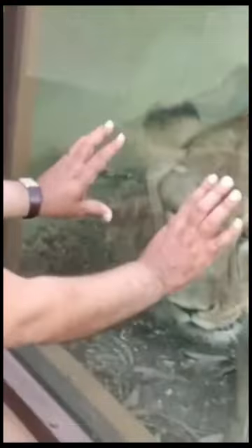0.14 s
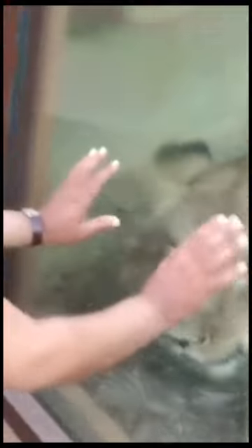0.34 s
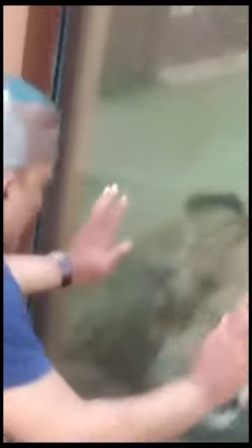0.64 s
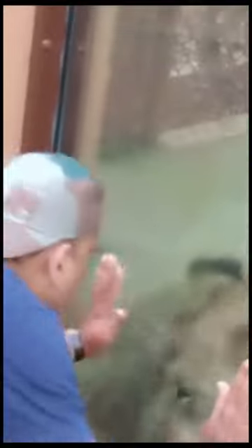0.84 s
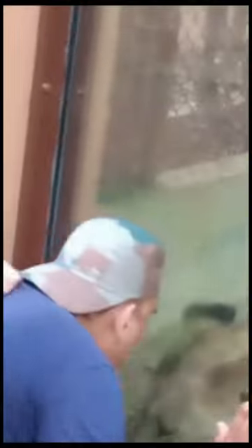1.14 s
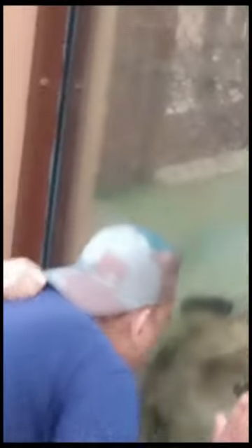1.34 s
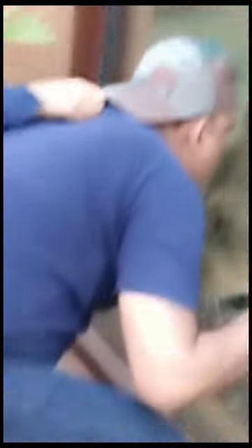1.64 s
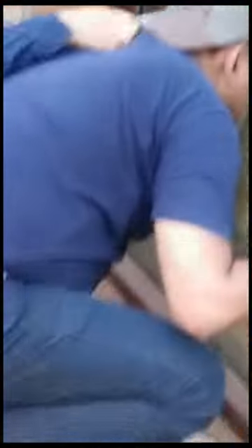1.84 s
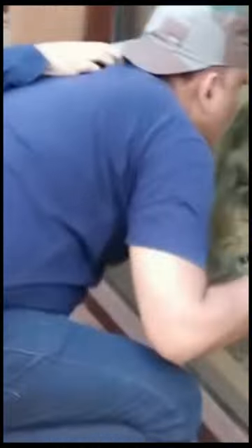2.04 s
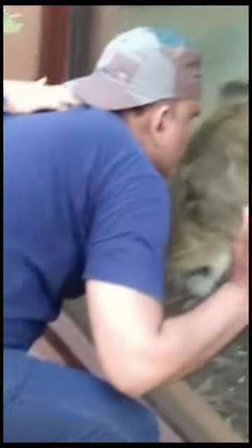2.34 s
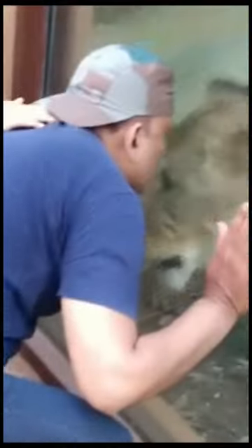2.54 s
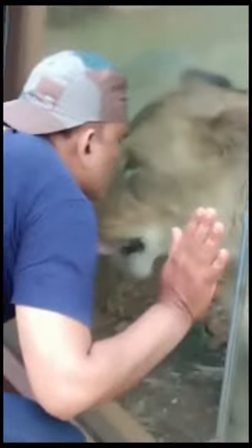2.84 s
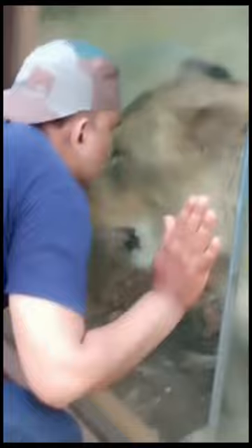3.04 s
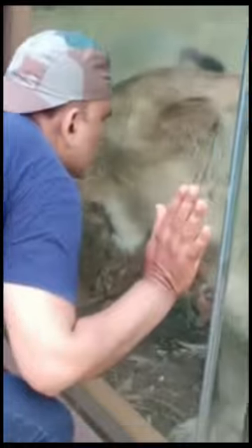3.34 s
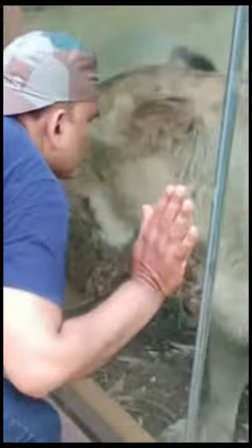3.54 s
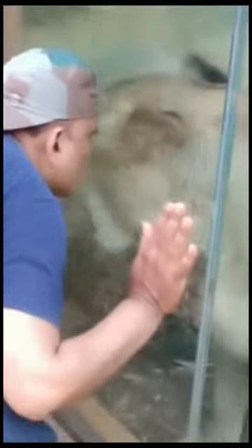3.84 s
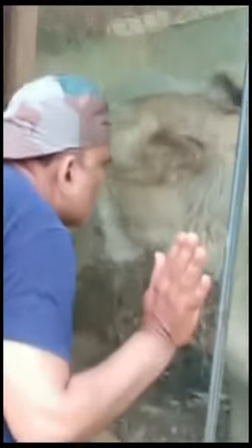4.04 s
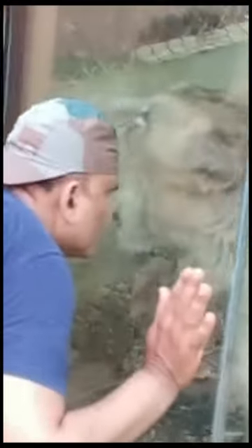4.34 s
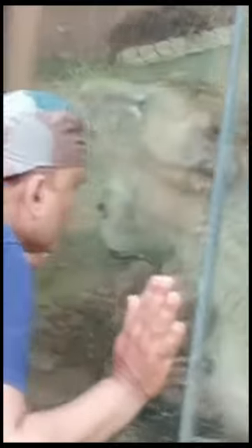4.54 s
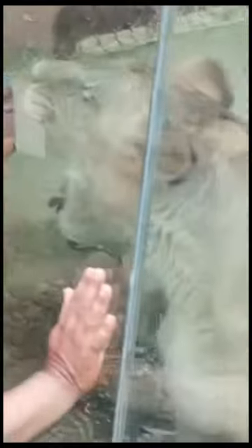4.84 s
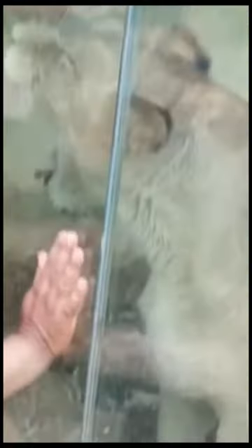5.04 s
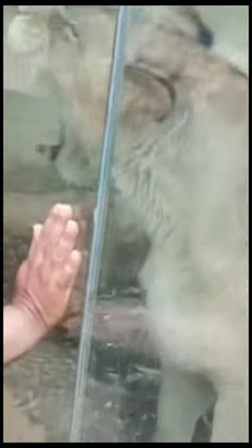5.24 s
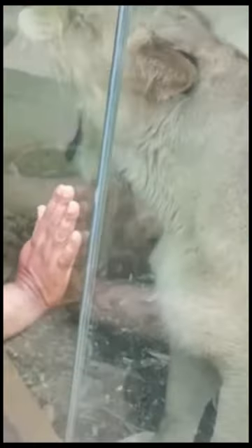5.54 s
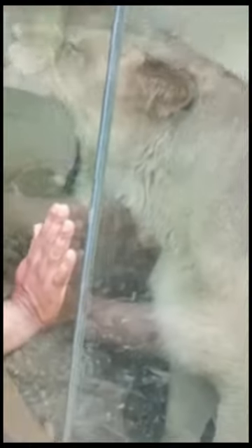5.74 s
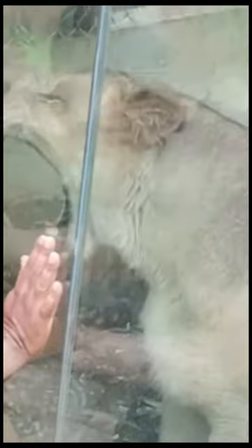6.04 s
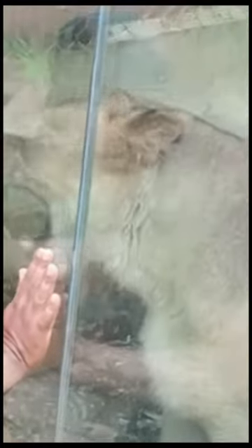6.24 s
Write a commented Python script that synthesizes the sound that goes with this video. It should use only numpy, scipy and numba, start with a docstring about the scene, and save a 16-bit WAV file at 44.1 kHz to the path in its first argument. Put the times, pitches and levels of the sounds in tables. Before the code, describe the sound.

At 0 s a lion's deep roar is already under way, close behind glass and left of centre, with a rough voice crack at once; it holds until about 0.3 s, then fades. Further grunts start near 0.8, 1.7, 2.6, 3.5, 4.3, 5.1 and 5.9 s. Each scoops up to a hum-like boom near 150-160 Hz, opens clean for a tenth of a second, then breaks into pulsing rasp and breathy air before sagging away. The first four are powerful and clip the phone; from 3.5 s they are weaker, slightly shorter and much rougher. Glass and nearby walls give a blurred half-second tail, far walls a faint humming echo. Tiny bird chirps appear around 0.4-1.4, 2.3 and 4.2-6.3 s, clearest at 0.9 s. Soft dull knocks fall at 4.3 and 5.1 s. Low outdoor rumble and faint hiss continue throughout.

```python
"""Eight deep grunting lion roars boom from behind enclosure glass, so close that a phone overloads.
Each is a near-sine boom that opens clean; flapping vocal folds then add a rasp and pulsing air.
Glass resonates, and near walls scatter the rasp as a noise tail; far walls return humming echoes.
Gliding sines make small bird chirps, decaying sines dull knocks, and filtered noise a quiet outdoor bed.
The first roar is already under way at the start."""
import sys
import numpy as np
from scipy import signal
from scipy.fft import rfft, irfft, next_fast_len
from scipy.io import wavfile
from scipy.ndimage import uniform_filter1d
from numba import njit

SR = 44100
rng = np.random.default_rng(int(sys.argv[2]) if len(sys.argv) > 2 else 0)


def wav_record(signal):
    """Record a signal, one row per channel, as 16-bit PCM in the file named by sys.argv[1]."""
    frames = np.transpose(np.atleast_2d(signal))
    bounded = np.clip(frames, -1, 1)
    # unit amplitude maps onto the largest positive 16-bit level
    quanta = np.round(bounded * 32767).astype(np.int16)
    wavfile.write(sys.argv[1], SR, quanta)


N = 281799
TIME = np.arange(N) / SR

# narrow rings of the glass front: f/Hz, width/Hz, level/dB
GLASS_RINGS = [(766, 19, 1.5), (335, 5.4, -0.5), (1031, 24, -5)]


def undb(db):
    """Decibels to gain."""
    return 10 ** (np.asarray(db) / 20)


def unit(x):
    """Scale to rms 1."""
    return x / np.sqrt(np.mean(x ** 2))


def even(x, window_s=.09):
    """Hold the short-term rms near 1, so that colour can change without setting the level."""
    return x / np.sqrt(uniform_filter1d(x ** 2, int(window_s * SR)) + 1e-12)


def ease(x):
    """Smooth step from 0 to 1 as x goes from 0 to 1."""
    return np.sin(np.pi / 2 * np.clip(x, 0, 1)) ** 2


def walk(rate):
    """Smooth chance that heads for a new value rate times a second; rms 1."""
    knots = rng.standard_normal(4096)
    path = np.interp(TIME * rate, np.arange(len(knots)), knots)
    return unit(uniform_filter1d(path, int(SR / rate / 2)))


def colour(x, points):
    """Filter by a spectrum of f/Hz, level/dB points, joined along log frequency."""
    hz, db = np.transpose(points)
    size = next_fast_len(x.shape[-1] + 4096)  # spare room for the filter's tail
    bins = np.maximum(np.fft.rfftfreq(size, 1 / SR), 1)
    gain = undb(np.interp(np.log(bins), np.log(hz), db))
    return irfft(rfft(x, size) * gain, size)[..., :x.shape[-1]]


@njit
def band(x, hz, width):
    """State-variable band-pass with a moving centre, gain 1."""
    y, band_state, low_state = np.empty(len(x)), 0., 0.
    for i in range(len(x)):
        g, damping = np.tan(np.pi * hz[i] / SR), width / hz[i]
        # the tiny offset keeps the states from fading into very slow arithmetic
        v = (band_state + g * (x[i] + 1e-18 - low_state)) / (1 + g * (g + damping))
        band_state = 2 * v - band_state
        low_state += 2 * g * v
        y[i] = damping * v
    return y


def ring(x, hz, width_hz):
    """One resonance, fixed or moving."""
    return band(x, hz * np.ones(N), float(width_hz))


def delay(x, seconds):
    """The same sound, later."""
    return np.interp(TIME - seconds, TIME, x, left=0)


def pan(x, left_db):
    """Set left against right by left_db, keeping the mean gain at 1."""
    gains = undb(np.array([[1], [-1]]) * left_db / 2)
    return x * gains / gains.mean(axis=0)


def scatter(x, t60_s, likeness):
    """A dense noise tail stands for many reflections, partly shared by the two channels."""
    t = TIME[:SR // 2]
    shared, *own = rng.standard_normal((3, len(t))) * np.exp(-np.log(1000) * t / t60_s)
    share = np.clip(likeness, 0, 1)
    tail = unit(np.sqrt(share) * shared + np.sqrt(1 - share) * np.array(own)) / np.sqrt(len(t))
    return signal.fftconvolve(x[None], tail, axes=1)[:, :N]


def outdoors(level_db=-44.5, side_db=-4, swell_db=1):
    """Filtered noise makes a low rumble and soft hiss that swell a little."""
    # background spectrum: f/Hz, level/dB
    outdoor_spectrum = [(25, -11), (45, 3.5), (68, 4), (100, -2.5), (155, 4.5), (260, -10), (500, -13.5),
                        (1200, -16.5), (2500, -21.5), (5000, -25), (8000, -28.5), (10500, -39)]
    mid, side = colour(rng.standard_normal((2, N)), outdoor_spectrum)
    both = unit(mid) + undb(side_db) * unit(side) * np.array([[1], [-1]])
    return pan(both * undb(level_db + swell_db * walk(3.5)), left_db=1.0)


def birds():
    """Short whistles are gliding sines; the distant ones sound warbled and blurred by the yard."""
    # calls in order: t/s, call name, level/dB ahead of swell and flutter, nearness (0-1)
    chirps = [(0.431, "slur", -53, 0.3), (0.529, "rise", -51, 0.24), (0.821, "arch", -52, 0.44),
              (.926, "tick", -41.5, 0.76), (1.405, "peep", -57, .5), (2.285, "slur", -51, 0.28),
              (4.236, "chirrup", -52.5, .15), (4.701, "chirrup", -53, .3), (4.832, "whistle", -51.5, 0.85),
              (5.277, "swoop", -46.5, .75), (5.712, "arch", -50.5, 0.72), (5.81, "rise", -54.5, 0.89),
              (5.92, "slur", -52.5, 0.3), (6.191, "chirrup", -51, .3), (6.316, "whistle", -55, 0.6)]
    # pitch shape of each named call: t/s into the call, f/Hz ahead of warble
    call_shapes = {"slur": [(0, 3000), (.04, 4634), (.085, 4750), (.12, 4290)], "chirrup": [(0, 3524),
                   (.012, 4250), (.028, 3370), (.055, 3290), (.1, 2590)], "whistle": [(0, 5730),
                   (.016, 7080), (.036, 5500), (.12, 4620)], "swoop": [(0, 6082), (.036, 3490),
                   (.072, 4500)], "arch": [(0, 3400), (.03, 4360), (.06, 3600)], "rise": [(0, 3250),
                   (.055, 4250)], "peep": [(0, 3080), (.018, 2420), (.09, 2330)], "tick": [(0, 5177),
                   (.018, 5400)]}
    warble_depth, changes_per_s, flutter_db = .08, 260, 4  # depth as a fraction of the pitch
    warble = warble_depth * walk(changes_per_s)
    flutter = undb(flutter_db * walk(changes_per_s))
    direct, distant = np.zeros((2, N))
    for start, call, db, nearness in chirps:
        s, pitch = np.transpose(call_shapes[call])
        on = (TIME >= start) & (TIME < start + s[-1])
        age, share = TIME[on] - start, np.clip(nearness, 0, 1)
        hz = np.interp(age, s, pitch) * (1 + (1 - share) * warble[on])
        swell = np.sqrt(2 * np.abs(np.sin(np.pi * age / s[-1])))
        note = undb(db) * swell * flutter[on] * np.sin(2 * np.pi * np.cumsum(hz) / SR)
        direct[on] += np.sqrt(share) * note
        distant[on] += np.sqrt(1 - share) * note
    # their direct sound reaches the right port first
    near = np.array([delay(direct, seconds=2 / SR), direct])
    return near + scatter(distant, t60_s=0.43, likeness=0)


def knocks(t60_s=0.19, pane_db=-10):
    """Each dull bump is a decaying sine, with a fainter one at the pitch of a glass ring."""
    # soft knocks: t/s, f/Hz, level/dB
    bumps = [(4.272, 260.2, -36.5), (5.069, 261.6, -34.5)]
    pane_hz = GLASS_RINGS[0][0]
    out = np.zeros(N)
    for start, hz, db in bumps:
        t = np.maximum(TIME - start, 0)
        tones = np.sin(2 * np.pi * hz * t) + undb(pane_db) * np.sin(2 * np.pi * pane_hz * t)
        out += undb(db) * tones * np.exp(-np.log(1000) * t / t60_s)
    return pan(out, left_db=6)


def enclosure(boom, throat, wet_db=-1, direct_db=-3, echo_rasp_db=-15):
    """Glass and near walls blur the rasp and air; far walls send back humming echoes."""
    # spectrum of what nearby walls and glass scatter back: f/Hz, level/dB
    scatter_spectrum = [(60, 5), (200, 9), (400, -2.5), (900, 6), (3000, 0), (10000, -4)]
    # echoes from far walls: delay t/s, level/dB
    far_walls = [(0.13, -24), (.275, -24)]
    shelter_hz, shelter_width_hz = 155, 11  # shelter resonance, near the pitch of the boom
    throat = throat + sum(undb(db) * ring(throat, hz, width) for hz, width, db in GLASS_RINGS)
    scattered = colour(scatter(throat, t60_s=0.42, likeness=0.6), scatter_spectrum)
    hum = ring(boom, shelter_hz, shelter_width_hz) + undb(echo_rasp_db) * throat
    echo = sum(undb(db) * delay(hum, seconds) for seconds, db in far_walls)
    # the roars sit left: left-right balance in dB over time, smaller in the loud, overloaded roars
    left_db = np.interp(TIME, [0, 2.8, 4.4], [6.2, 5.8, 7])
    near = pan(boom + undb(direct_db) * throat, left_db)
    near = near + pan(undb(wet_db) * scattered, left_db=3.0)
    return near + pan(echo, left_db=-1)


def effort():
    """The push of each roar opens clean, turns rough, holds and fades, steering pitch and gains."""
    # one row a roar: start t/s, hold/s, 60 dB boom fade/s, f/Hz ahead of scoop and sag,
    # boom level/dB, rasp level/dB, air level/dB, roughness (0-1, clipped later)
    roars = [(-0.2, .495, 0.4549, 159.3, -2, -11, -36.5, .5),
             (0.823, 0.28, 0.43, 156.3, -1, -15, -36.5, .42),
             (1.678, 0.3, 0.51, 157.2, -3, -14.5, -38, .44), (2.604, 0.26, 0.557, 157.8, -2, -16, -38, .42),
             (3.485, 0.24, 0.7, 157.3, -8.5, -19.5, -42, .85),
             (4.312, .24, 0.3347, 152, -8, -21.5, -43.5, .95),
             (5.123, 0.23, 0.39, 151, -8.5, -21, -43.5, .95),
             (5.936, 0.21, 0.43, 149.8, -6, -21.5, -41.5, 1.1)]
    # voice cracks, when the boom drops and the rasp flares: t/s, half length/s, boom dip level/dB
    cracks = [(0.028, 0.11, 7.5), (1.815, 0.016, 3.5), (2.754, 0.018, 8), (3.652, 0.017, 9.5),
              (4.497, 0.013, 8), (5.316, 0.016, 3), (6.096, 0.021, 2.5)]
    crack_flare, crack_roughness_per_db = 0.49, -0.02  # rasp gain in dB, and roughness, per dB of dip
    # openings share one boom level; rasp and air are held back relative to their own levels
    opening_boom_db, opening_rasp_db, opening_air_db, opening_roughness = -5, -5, -2, .05
    boom_attack_s, rasp_attack_s, air_attack_s = 0.12, 0.074, 0.11
    clean_s, breaking_s = .09, .07  # clean opening; time the folds then take to turn rough
    scoop_hz, scoop_s, sag_hz, sag_s = 20.95, .066, 9, .11  # pitch scoops up, then sags in the fade
    droop_db_per_s = 19.5  # the rasp tires while the roar is held
    rasp_fade, air_fade = 1.23, 1.9  # speed of their fades, relative to the boom's
    slackening_s, slack_roughness = .08, 0.97  # the folds go slack and rough as the roar fades
    air_lingers_s = 0.029  # the air keeps rushing this long after the voice starts to fade

    rows = np.array(roars)
    current = np.maximum(np.searchsorted(rows[:, 0], TIME) - 1, 0)
    start, hold_s, fade_s, top_hz, boom_db, rasp_db, air_db, roughness = rows[current].T
    age = TIME - start
    fading = np.maximum(age - hold_s, 0)
    fade_db = -60 * fading / fade_s
    air_fade_db = -60 * np.maximum(fading - air_lingers_s, 0) / fade_s
    clean = 1 - ease((age - clean_s) / breaking_s)
    crack_db = sum(db * np.exp(-((TIME - s) / half_s) ** 2) for s, half_s, db in cracks)

    pitch = top_hz - scoop_hz * np.exp(-(age / scoop_s) ** 2) - sag_hz * ease(fading / sag_s)
    rough = roughness + clean * (opening_roughness - roughness)
    rough = rough + ease(fading / slackening_s) * (slack_roughness - roughness)
    rough = np.clip(rough + crack_roughness_per_db * crack_db, 0, 1)

    boom_db = boom_db + clean * (opening_boom_db - boom_db) - crack_db + fade_db
    droop_db = droop_db_per_s * np.maximum(np.minimum(age, hold_s) - clean_s - breaking_s, 0)
    rasp_db = rasp_db + clean * opening_rasp_db + crack_flare * crack_db - droop_db
    rasp_db = rasp_db + rasp_fade * fade_db
    air_db = air_db + clean * opening_air_db + air_fade * air_fade_db
    boom = ease(age / boom_attack_s) * undb(boom_db)
    rasp = ease(age / rasp_attack_s) * undb(rasp_db)
    air = ease(age / air_attack_s) * undb(air_db)
    return pitch, rough, crack_db, boom, rasp, air


def fold_pulses(cycles, rough, flap_hz=69.24, flap_depth=2.1, flap_wander=0.1141,
                flap_shift_s=.0002, scatter_db=4.0, slip_s=.0008):
    """One pulse as the folds close; when rough, their pads flap more slowly and pulses slip in time."""
    at = np.flatnonzero(np.diff(np.floor(cycles)) > 0)
    size_chance, slip_chance = rng.standard_normal((2048, 2))[:len(at)].T
    r = rough[at]
    flap_rate = flap_hz * (1 + flap_wander * rough * walk(60))
    flap = (2 * np.pi * np.cumsum(flap_rate) / SR)[at]
    depth = np.minimum(flap_depth * np.sqrt(r), 1)
    size = (1 + depth * np.cos(flap)) * undb(scatter_db * r * size_chance)
    # the flap also hastens and delays the closures, which favours the sideband above each harmonic
    shift_s = slip_s * r ** 2 * slip_chance - flap_shift_s * depth * np.sin(flap)
    return np.bincount(np.clip(at + SR * shift_s, 0, N - 1).astype(int), size, N)


def lion(jitter=.035, shimmer_db=3.5, air_db=-0.5, air_pulsing=0.094, rattle_db=4.0,
         rasp_db=-0.5, overload_hiss_db=-12):
    """Heavy folds give a near-sine boom, pulses that ring the throat, and puffs of air."""
    # colour of the fold pulses after throat and mouth: f/Hz, level/dB
    throat_spectrum = [(35, -16), (68, -2.5), (110, -5), (155, -12.5), (230, 2), (300, -2), (400, 4),
                       (480, -4), (590, -6.5), (690, -18.5), (880, -27.5), (1050, -21.5), (1600, -30),
                       (4000, -51)]
    # main throat resonance, mostly sinking as the lion tires: t/s, centre f/Hz, level/dB ahead of cracks
    formant = [(0, 419.4, 5.5), (.25, 386.6, 0), (1.0, 385, 5), (1.9, 405.6, 6.5), (2.75, 407, 4),
               (3.68, 387.5, -1.5), (4.5, 352.6, -2.5), (5.3, 373, -4), (6.1, 367.4, 3.5)]
    # colour of the air rushing through the throat: f/Hz, level/dB
    air_spectrum = [(300, -21.5), (700, 0.5), (1250, 4), (1650, -10.5), (2350, 1), (3500, -11.5),
                    (5300, -9), (6600, -17.5), (8000, -16), (11000, -33.5)]
    # bright hiss that stands for the hard treble of the overloaded phone: f/Hz, level/dB
    overload_spectrum = [(2500, -29), (4000, -4.5), (5200, -1), (6600, -9.5), (8200, -3.5), (11000, -11)]
    crack_resonance = 1.2  # dB that the resonance gains in a crack, per dB of boom lost

    pitch, rough, crack_db, boom_gain, rasp_gain, air_gain = effort()
    cycles = np.cumsum(pitch * (1 + jitter * rough * walk(130))) / SR
    boom = np.sqrt(2) * np.sin(2 * np.pi * cycles) * undb(shimmer_db * rough * walk(70))

    pulses = fold_pulses(cycles, rough)
    rasp = colour(pulses - pulses.mean(), throat_spectrum)
    s, centre, strength = np.transpose(formant)
    resonance_db = np.interp(TIME, s, strength) + crack_resonance * crack_db
    resonance = ring(rasp, np.interp(TIME, s, centre), width_hz=53)
    rasp = even(rasp + undb(resonance_db) * resonance)

    # air escapes once a cycle, and flutters when the folds are rough
    puffs = (1 + air_pulsing * np.cos(2 * np.pi * cycles)) * undb(rattle_db * rough * walk(80))
    rush, hiss = rng.standard_normal((2, N)) * puffs
    # the overload hiss follows the loudness of the boom, and shares the gain of the air
    overload_hiss = undb(overload_hiss_db) * boom_gain * unit(colour(hiss, overload_spectrum))
    air = unit(colour(rush, air_spectrum)) + overload_hiss
    throat = undb(rasp_db) * rasp * rasp_gain + undb(air_db) * air * air_gain
    return boom * boom_gain, throat


def scene():
    """The lion in its enclosure, with birds, knocks and the outdoor bed."""
    left, right = enclosure(*lion())
    # the lion's sound reaches the left port slightly later
    roaring = np.array([delay(left, seconds=.000025), right])
    return roaring + birds() + knocks() + outdoors()


def record(dry):
    """The phone clips the loudest booms flat and cuts the top."""
    top_hz = 10950
    clipped = np.clip(dry, -1, 1)
    return signal.sosfiltfilt(signal.ellip(8, .05, 60, top_hz, fs=SR, output="sos"), clipped)


dry = scene()
out = record(dry)
wav_record(out)
```